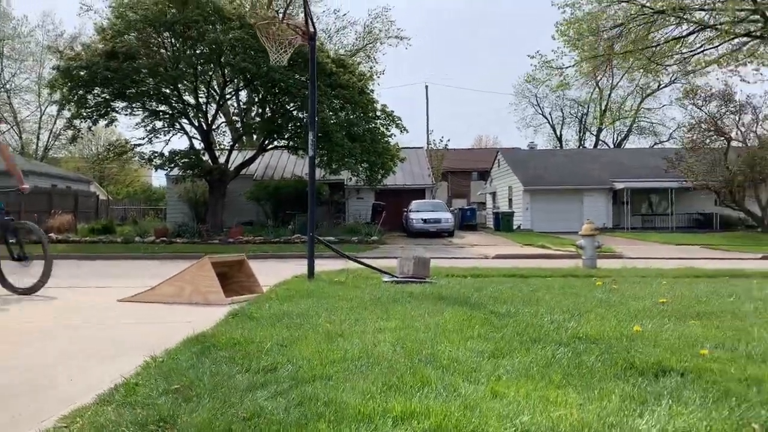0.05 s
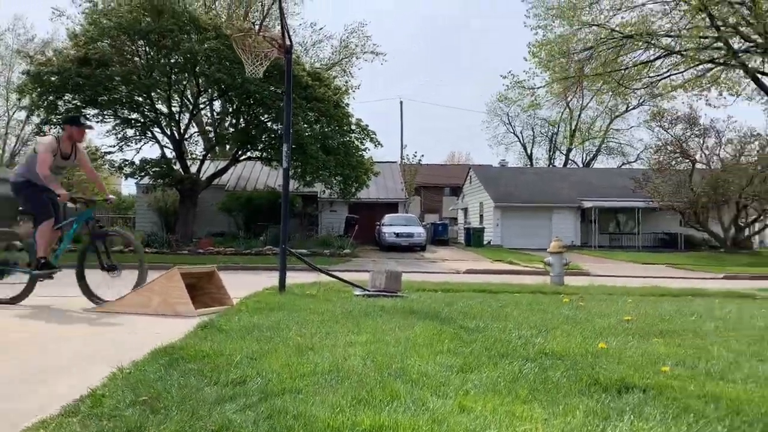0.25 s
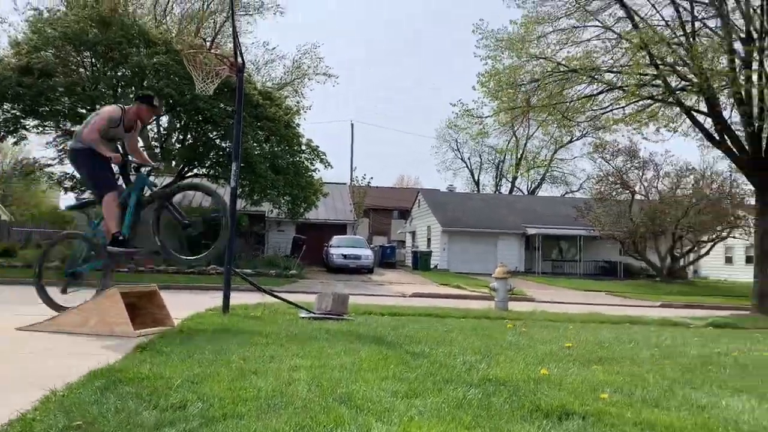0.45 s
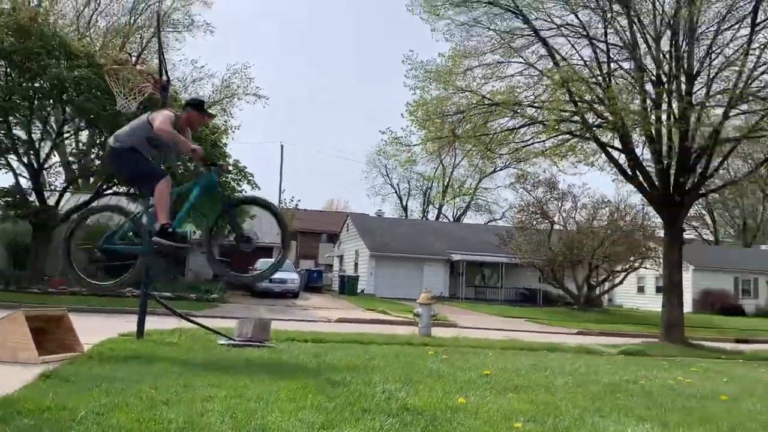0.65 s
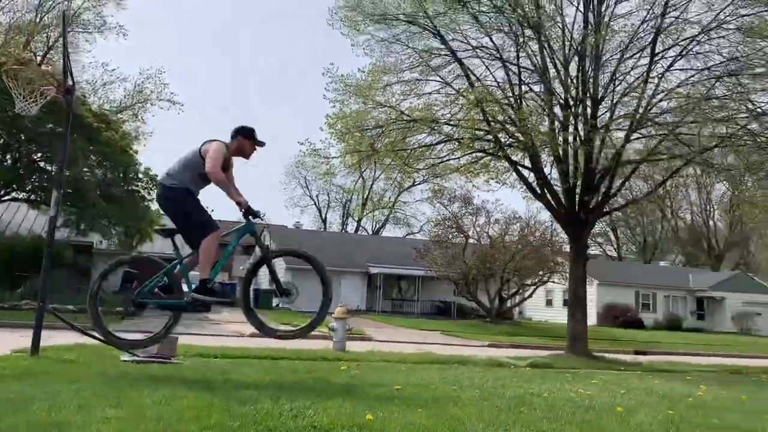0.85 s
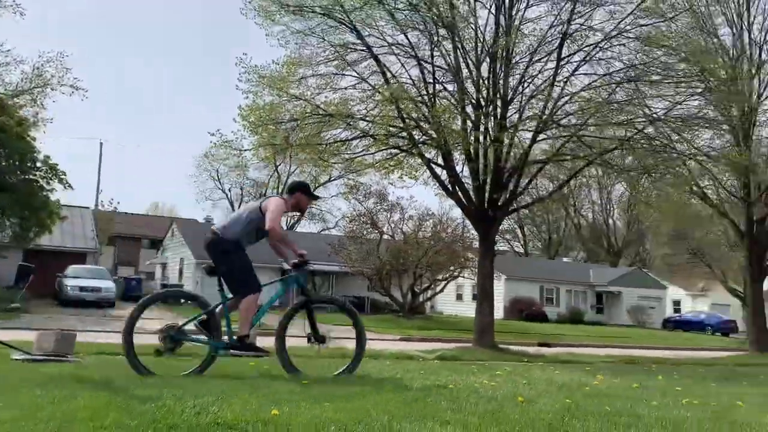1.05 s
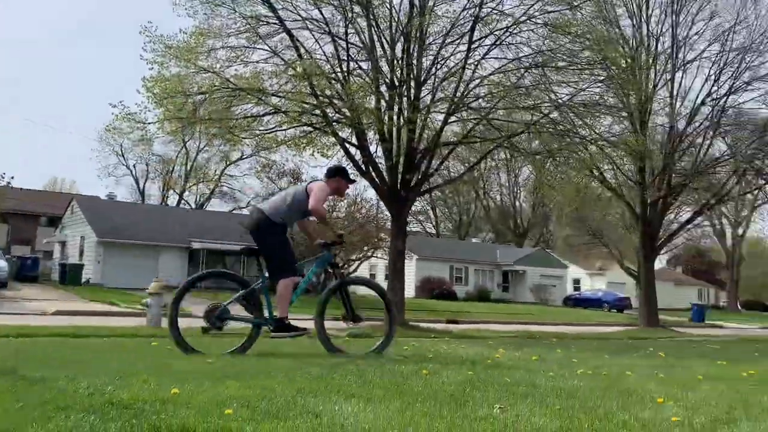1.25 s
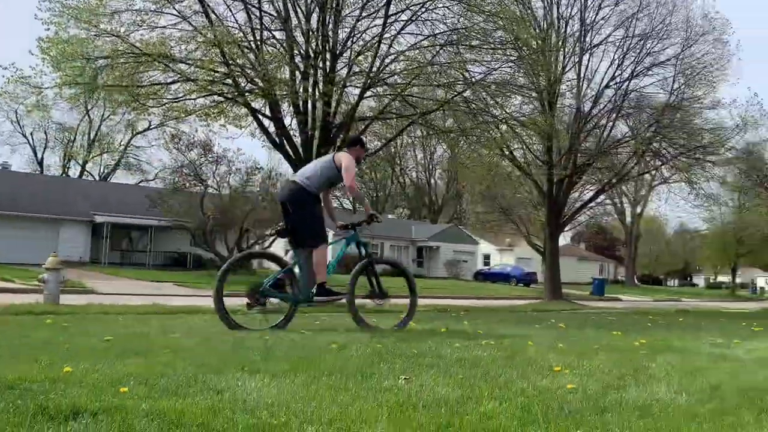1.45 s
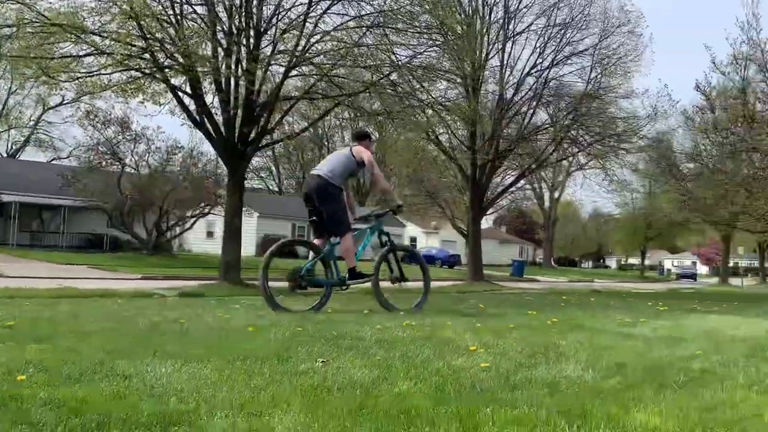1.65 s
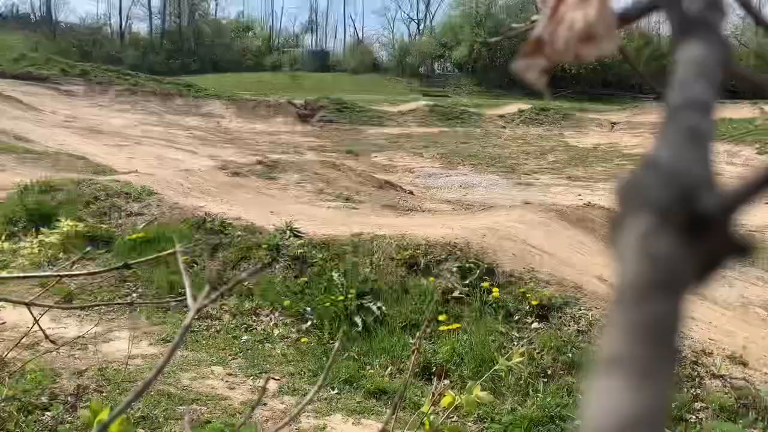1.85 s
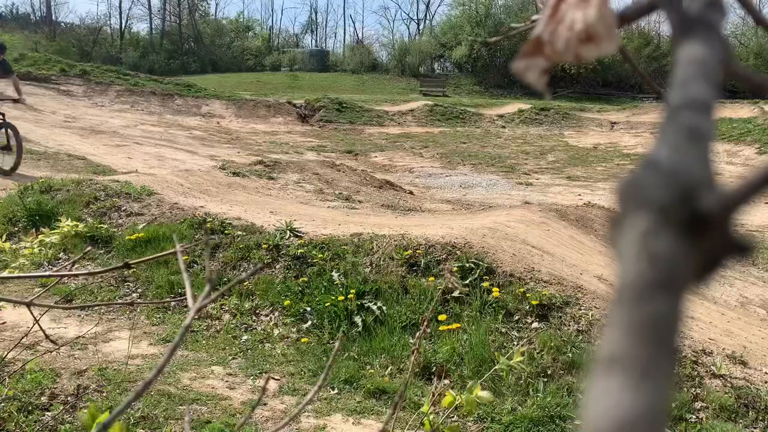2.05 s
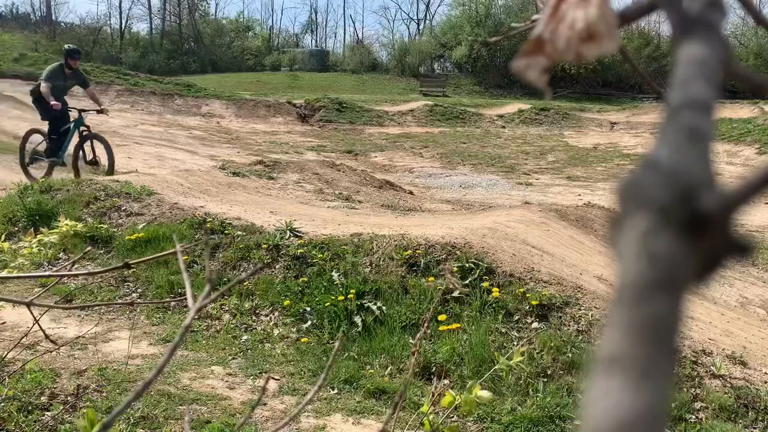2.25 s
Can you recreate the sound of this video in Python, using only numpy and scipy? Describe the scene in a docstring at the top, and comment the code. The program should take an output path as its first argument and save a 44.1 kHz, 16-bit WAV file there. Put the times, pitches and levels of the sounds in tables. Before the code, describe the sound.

A bike thumps over a wooden ramp, lands on grass and rolls on, with wind rumble.

```python
"""A mountain bike coasts over a hollow wooden ramp, front wheel then rear: boards ring, the box booms. It flies
with its freewheel ticking, lands on a lawn with a swish and a chain clack, and rolls on. Wind rumbles and
knocks at the microphone. Then, just after a last frame rattle, the scene changes to a dirt track, where a
distant bike rolls closer."""
import sys
import numpy as np
from scipy import signal
from scipy.fft import rfft, irfft, next_fast_len
from scipy.io import wavfile
from scipy.ndimage import map_coordinates

SR = 44100
rng = np.random.default_rng(int(sys.argv[2]) if len(sys.argv) > 2 else 0)


def file_out(sig):
    """Save sig as 16-bit WAV at sys.argv[1]."""
    # one column per channel
    cols = np.atleast_2d(sig).T
    # limit, then scale
    lim = np.clip(cols, -1, 1)
    pcm = np.round(lim * 32767).astype(np.int16)
    wavfile.write(sys.argv[1], SR, pcm)


N = 105840

# tyre noise on concrete and plywood: f/Hz, level/dB
HARD_GROUND = [(150, 4), (600, 5.5), (1800, -8.5), (2700, -11.5), (4800, -16), (7000, -27.5), (16000, -29)]
BIKE_LEAD_S, BUMPS_PER_S = 0.00013, 14


def amp(db):
    """Decibels to gain."""
    return 10 ** (np.asarray(db) / 20)


def unit(x):
    """Scale to rms 1."""
    return x / np.sqrt(np.mean(x ** 2) + 1e-20)


def along(points, hz):
    """Interpolate (f/Hz, value) points on a log axis."""
    f, v = np.transpose(points)
    return np.interp(np.log(hz + 1), np.log(f + 1), v)


def clock():
    """Sample times in s."""
    return np.arange(N) / SR


def since(s):
    """Time since s, zero before it."""
    return np.maximum(clock() - s, 0)


def curve(points):
    """Interpolate (t/s, value) points at each sample."""
    return np.interp(clock(), *np.transpose(points))


def level(points):
    """Gain along (t/s, level/dB) points."""
    return amp(curve(points))


def fade(t, t60_s, rise_s=0.0001):
    """Quick rise, exponential decay."""
    return (1 - np.exp(-t / rise_s)) * np.exp(-np.log(1000) * t / t60_s)


def wobble(knots_per_s):
    """Smooth random curve."""
    return map_coordinates(rng.standard_normal(int(N * knots_per_s / SR) + 4), [clock() * knots_per_s])


def filtered(x, response):
    """Apply a frequency response."""
    m = next_fast_len(N + SR // 4)
    return irfft(rfft(x, m) * response(np.fft.rfftfreq(m, 1 / SR)), m)[..., :N]


def placed(x, lead_s, pan_db=0):
    """Mono to stereo; positive values make the left earlier and louder."""
    sides = np.array([[.5], [-.5]])
    return filtered(x, lambda hz: amp(sides * pan_db) * np.exp(2j * np.pi * hz * lead_s * sides))


def spread(pair, spectrum):
    """Colour two unrelated signals and mix them to open-air stereo of rms 1."""
    # left-right likeness of open air: f/Hz, correlation
    likeness = [(60, 0.67), (250, 0.79), (500, 0.36), (1000, -0.11)]
    turn = lambda hz: np.arccos(np.clip(along(likeness, hz), -1, 1)) / 2
    mid, side = filtered(pair, lambda hz: amp(along(spectrum, hz)) * [np.cos(turn(hz)), np.sin(turn(hz))])
    return unit(np.array([mid + side, mid - side]))


def noise(spectrum):
    """Coloured stereo noise."""
    return spread(rng.standard_normal((2, N)), spectrum)


def crunch(spectrum, snaps_per_s=420, snap_db=-4):
    """Tiny uneven snaps on a bed of noise."""
    snaps = (rng.random(N) < snaps_per_s / SR) * rng.standard_normal((2, N))
    return unit(noise(spectrum) + amp(snap_db) * spread(snaps, spectrum))


def ring(modes, t, rise_s, pitch=1, scatter_db=2.0):
    """Damped modes, their levels scattered at each blow."""
    return sum(amp(db + scatter_db * rng.normal()) * fade(t, t60_s, rise_s)
               * np.sin(2 * np.pi * hz * pitch * t) for hz, db, t60_s in modes)


def wind(air_db=-51):
    """Gusty rumble over faint outdoor air."""
    # gusts: t/s, level/dB
    gusts = [(0, -39.5), (.06, -61), (.16, -51.5), (.29, -36), (.56, -24.5), (.66, -32), (.76, -43),
             (1.04, -35.5), (1.15, -44), (1.55, -41), (1.7, -36.5)]
    # spectra: f/Hz, level/dB
    rumble = [(22, -55), (42, -8.5), (60, 4.5), (100, 0.5), (170, -6), (350, -22.5), (1500, -56.5)]
    air = [(100, 9.5), (500, -23.5), (1200, -8), (3000, -20), (6000, -25.5), (16000, -83)]
    return level(gusts) * noise(rumble) + amp(air_db) * noise(air)


def freewheel(click_t60_s=.008, tail_db=-20, tail_t60_s=.06):
    """One bright click each time the pawl drops over a tooth."""
    # tooth rate: t/s, rate/Hz
    tooth_rate = [(0, 50.9), (.24, 49.7), (.31, 37.5), (.42, 49.3), (.67, 28.8), (.81, 47.8), (.87, 39.7),
                  (1.02, 51.1), (1.17, 38.2), (1.22, 56.4), (1.29, 41.9), (1.72, 41.2)]
    # click strength: t/s, level/dB
    click_levels = [(0, -61.5), (.2, -46.5), (.64, -45), (.75, -50), (1.15, -36.5), (1.72, -47)]
    # pawl spectrum: f/Hz, level/dB
    pawl = [(3000, -10.5), (8500, -6.5), (10300, 7), (12000, 2.5), (16000, -12)]
    teeth_passed = np.floor(np.cumsum(curve(tooth_rate)) / SR + .5)
    drops = np.diff(teeth_passed, prepend=teeth_passed[0])
    drops *= amp(curve(click_levels) + 2 * rng.standard_normal(N))
    t = clock()[:SR // 10]
    click = fade(t, click_t60_s) + amp(tail_db) * fade(t, tail_t60_s)
    return signal.fftconvolve(drops, click)[:N] * noise(pawl)


def tyres(bump_db=3.5):
    """Rolling on concrete and plywood, then swishing through grass over bumpy soil."""
    # rolling noise per surface: t/s, level/dB
    driveway = [(0, -59.5), (.16, -58.5), (.22, -38), (.42, -46), (.55, -55), (.72, -78)]
    grass = [(.875, -72), (.9, -53.5), (.925, -41), (.965, -36), (1.03, -41.5), (1.07, -45), (1.14, -54),
             (1.5, -58.5), (1.72, -54.5)]
    turf = [(.75, -66), (.82, -43), (.9, -48), (.97, -39), (1.15, -55.5), (1.55, -57), (1.68, -48)]
    # swish and rumble spectra: f/Hz, level/dB
    blades = [(350, -17.5), (1200, 4), (2600, 6.5), (7000, 2.5), (10000, 5.5), (16000, -7.5)]
    soil = [(60, -3.5), (150, -3), (280, -6), (450, -15), (8000, -69)]
    bumps = unit(amp(bump_db * wobble(BUMPS_PER_S)))
    roll = level(driveway) * noise(HARD_GROUND)
    swish = level(grass) * crunch(blades)
    return roll + swish + level(turf) * bumps * noise(soil)


def chain(slap_t60_s=0.051, rattle_t60_s=0.13):
    """Steel slaps, hardest on landing; loose fittings rattle, once more just as the scene changes."""
    # chain slaps: t/s, level/dB
    chain_hits = [(0.171, -49.5), (0.41, -39), (0.473, -47), (0.957, -30), (1.0004, -18), (1.424, -37.5),
                  (1.66, -41), (2.321, -39)]
    # frame rattles, the last just as the scene changes: t/s, level/dB
    soft_hits = [(0.951, -32.5), (1.005, -34), (1.04, -46.5), (1.096, -42), (1.365, -42.5), (1.555, -53),
                 (1.631, -45.5), (1.72, -42.5)]
    # spectra: f/Hz, level/dB
    steel = [(300, -26), (7000, -2.5), (9500, 14), (10500, 6.5), (16000, -4)]
    frame = [(400, -19), (650, 0.5), (1000, -13), (2600, 4), (3400, -9.5), (4900, 1.5), (9000, -10.5)]
    slaps = sum(amp(db) * fade(since(s), slap_t60_s) for s, db in chain_hits)
    bursts = sum(amp(db) * fade(since(s), rattle_t60_s, rise_s=0.0022) for s, db in soft_hits)
    steel_noise = unit(filtered(rng.standard_normal(N), lambda hz: amp(along(steel, hz))))
    return placed(slaps * steel_noise, lead_s=.000025) + bursts * crunch(frame)


def ramp(ring_rise_s=0.00069, boom_lag_s=.0005, boom_rise_s=0.0066):
    """Each tyre cracks on the plywood, rings the boards and its wheel, then swells the box's boom."""
    # tyre strikes: t/s, boom level/dB, board level/dB, crack level/dB, boom pitch ratio
    blows = [(0.2243, -11, -18, -23, 1), (0.279, -16, -33.5, -46, 0.87),
             (0.3971, -13.5, -24.5, -29.5, 1.02), (.456, -23.5, -40, -57, 0.92)]
    # modes: f/Hz, level/dB, t60/s
    box_modes = [(124, -18, 0.44), (177.5, 2, 0.11), (232.5, -0.5, 0.087), (320, -7.5, 0.12),
                 (394, -3.5, 0.079)]
    board_modes = [(500, -8, 0.1), (587, 1, 0.13), (693, -3, 0.19), (807, -6, 0.14), (1004, -5, 0.1)]
    front_modes = [(1335, -35, .1), (1615, -35, .12), (2735, -28, .065)]
    rear_modes = [(442, -15, 0.045), (1039, -34, 0.11), (2506, -30, .05), (3410, -22, .035)]
    box, boards, crack = np.zeros((3, N))
    for s, boom_db, board_db, crack_db, pitch in blows:
        t, late = since(s), since(s + boom_lag_s)
        swell = 2 * (1 - np.exp(-late / boom_rise_s))
        box += amp(boom_db) * ring(box_modes, late, boom_rise_s, pitch) * swell
        boards += amp(board_db) * ring(board_modes, t, ring_rise_s) / 2
        snap = fade(t, t60_s=0.021, rise_s=ring_rise_s)
        rattle = fade(t, t60_s=0.21, rise_s=ring_rise_s)
        crack += amp(crack_db) * (snap + rattle)
    front = ring(front_modes, since(blows[0][0]), ring_rise_s)
    rear = ring(rear_modes, since(blows[2][0]), ring_rise_s)
    body = placed(box + front + rear, BIKE_LEAD_S, pan_db=1)
    return body + placed(boards, BIKE_LEAD_S, pan_db=9) + crack * noise(HARD_GROUND)


def yard(x, t60_s=0.38, cutoff_hz=1200):
    """Thin, dull scatter from houses and trees."""
    tail = rng.standard_normal((2, SR // 2)) * fade(clock()[:SR // 2], t60_s, rise_s=0.0044)
    dull = filtered(x, lambda hz: 1 / (1 + (hz / cutoff_hz) ** 2))
    return signal.fftconvolve(dull, tail / np.linalg.norm(tail[0]), axes=1)[:, :N]


def knocks(sag_s=0.0024, end_hz=120.3, roughness=1.1):
    """Short, rough wind knocks at the microphone, each falling fast in pitch."""
    # knocks: t/s, level/dB, starting f/Hz
    hits = [(0.514, -20, 550), (.5305, -16.5, 954), (0.552, -16.5, 1734), (0.5747, -16, 1150),
            (0.591, -27.5, 1010), (0.599, -15, 556), (0.614, -15, 740)]
    out = np.zeros(N)
    for s, db, start_hz in hits:
        t = since(s)
        sag = np.exp(-t / sag_s)
        cycles = end_hz * t + (start_hz - end_hz) * sag_s * (1 - sag)
        rough = roughness * np.sqrt(sag) * wobble(knots_per_s=800) * np.cos(np.pi * start_hz * t)
        out += amp(db) * fade(t, t60_s=0.11, rise_s=0.0018) * (np.sin(2 * np.pi * cycles) + rough)
    return out


def thuds(t60_s=0.059, rise_s=0.00094):
    """Soft low thuds from gusts and from wheels on turf."""
    # thuds: t/s, level/dB, f/Hz
    hits = [(0.653, -14, 88.5), (.813, -26, 130), (0.837, -24, 96), (0.892, -28.5, 135), (.947, -28.5, 272),
            (.976, -30.5, 242), (1.016, -29.5, 218), (1.054, -23.5, 134), (1.238, -26, 103),
            (1.363, -27.5, 146), (1.398, -24.5, 91), (1.452, -26.5, 106), (1.573, -30, 143),
            (1.656, -17.5, 73.6)]
    return sum(amp(db) * fade(since(s), t60_s, rise_s) * np.sin(2 * np.pi * hz * since(s))
               for s, db, hz in hits)


def dirt_track(whirr_hz=461, waver=.035, flutter_db=4, whirr_db=-54.5, drone_db=-38):
    """Rolling rush, wavering tyre whirr, a low drone, and grit that grows as the bike nears."""
    # tyres on the track: t/s, level/dB
    rolling = [(1.74, -42), (2.05, -44), (2.35, -41.5)]
    grit = [(2, -65.5), (2.3, -61.5), (2.4, -48)]
    # spectra: f/Hz, level/dB
    dirt = [(120, -22), (240, 2), (320, -1.5), (1150, -5), (1700, -11), (4800, -21), (6000, -34.5),
            (16000, -76)]
    gravel = [(1500, -28), (5000, 12), (11000, 14.5), (16000, 5)]
    drone = [(20, -16), (79, 6.5), (100, 1), (145, -4), (300, -21.5), (800, -70)]
    cycles = np.cumsum(whirr_hz * (1 + waver * wobble(knots_per_s=14))) / SR
    whirr = unit(amp(flutter_db * wobble(BUMPS_PER_S)) * np.sin(2 * np.pi * cycles))
    rush = level(rolling) * crunch(dirt) + amp(whirr_db) * placed(whirr, BIKE_LEAD_S, pan_db=13)
    return rush + amp(drone_db) * noise(drone) + level(grit) * crunch(gravel)


def scene(cut_s=1.722, yard_db=-13.5):
    """The jump on the lawn, then the dirt track; the chain clacks in both."""
    wood = ramp()
    scatter = amp(yard_db) * yard(wood)
    buffets = placed(knocks() + thuds(), lead_s=-0.00039)
    lawn = wood + scatter + buffets + freewheel() + tyres() + wind()
    return np.where(clock() < cut_s, lawn, dirt_track()) + chain()


def record(dry, top_hz=16200):
    """Microphone ports notch the treble; nothing passes above the band limit."""
    # port notches: f/Hz, width/Hz, level/dB
    ports = [(8486, 750, -15.5), (13050, 450, -15)]
    notches = lambda hz: amp(sum(db * np.exp(-((hz - f) / width) ** 2) for f, width, db in ports))
    return filtered(dry, lambda hz: notches(hz) * (hz < top_hz))


dry = scene()
out = record(dry)
file_out(out)
```